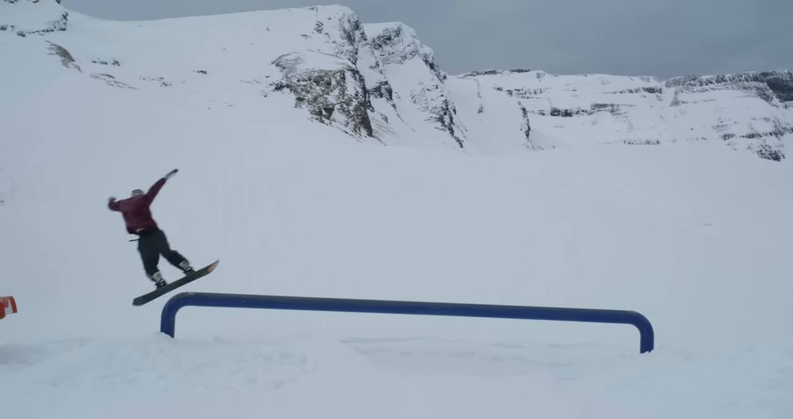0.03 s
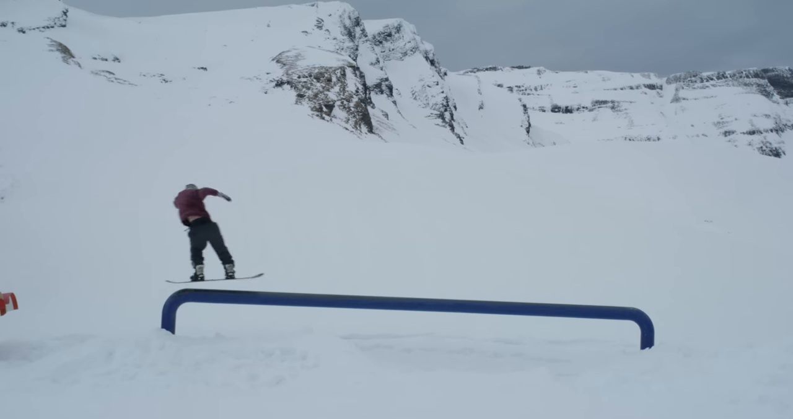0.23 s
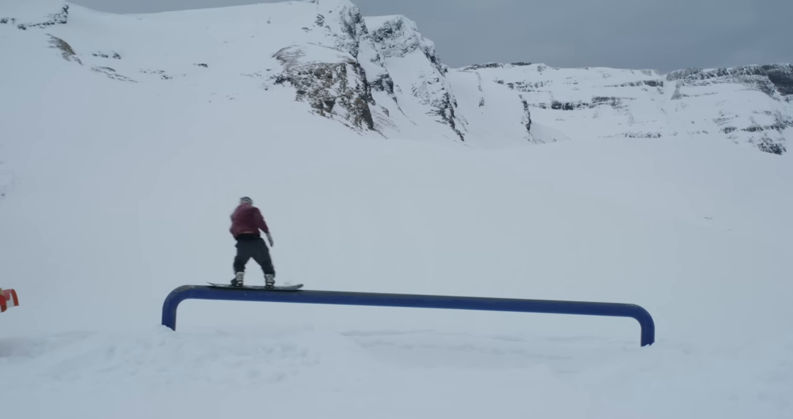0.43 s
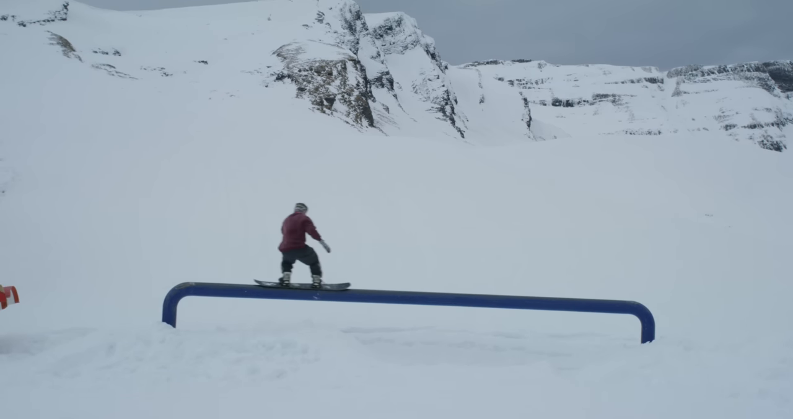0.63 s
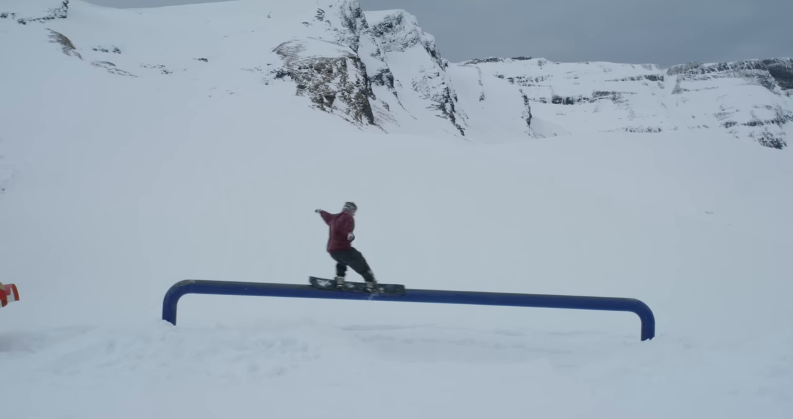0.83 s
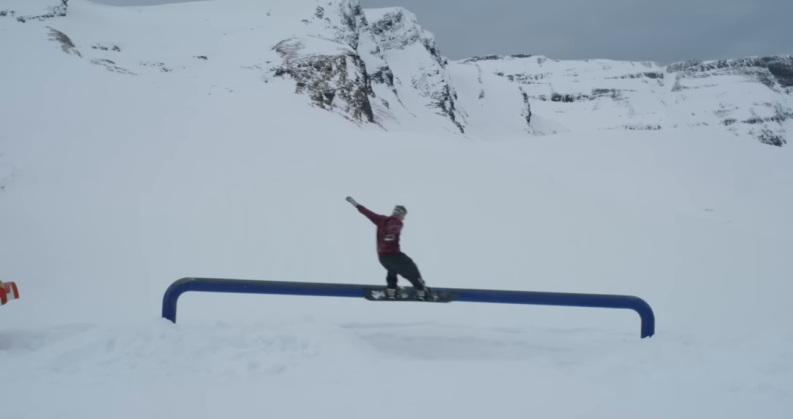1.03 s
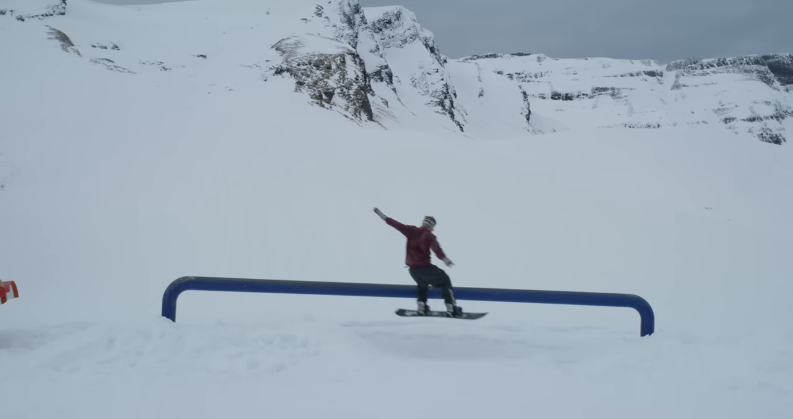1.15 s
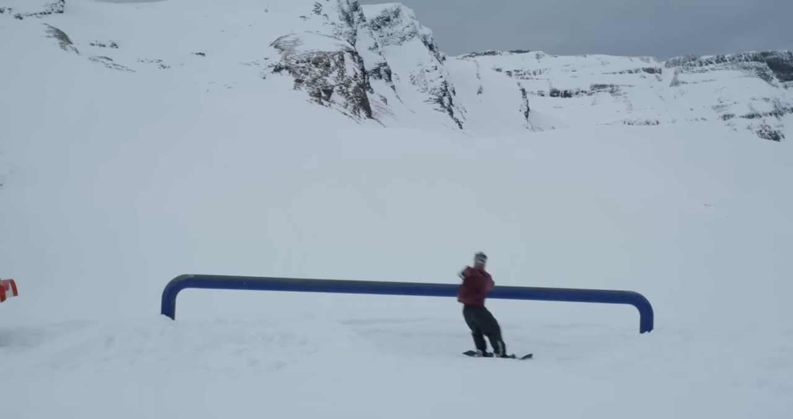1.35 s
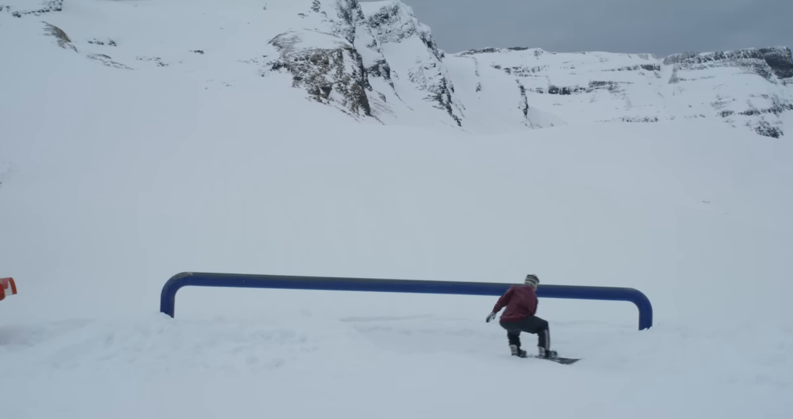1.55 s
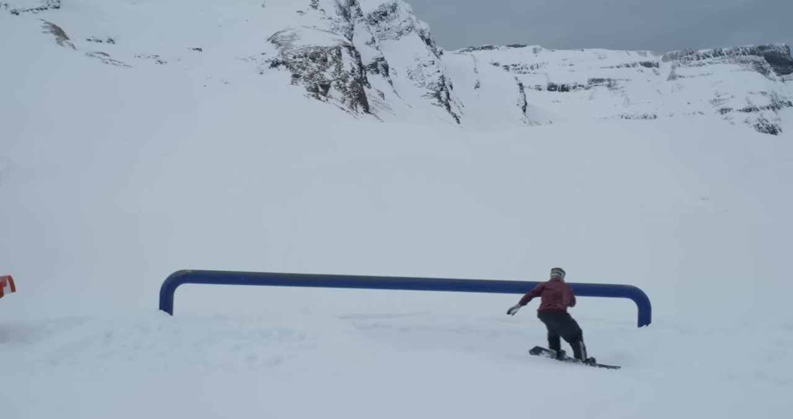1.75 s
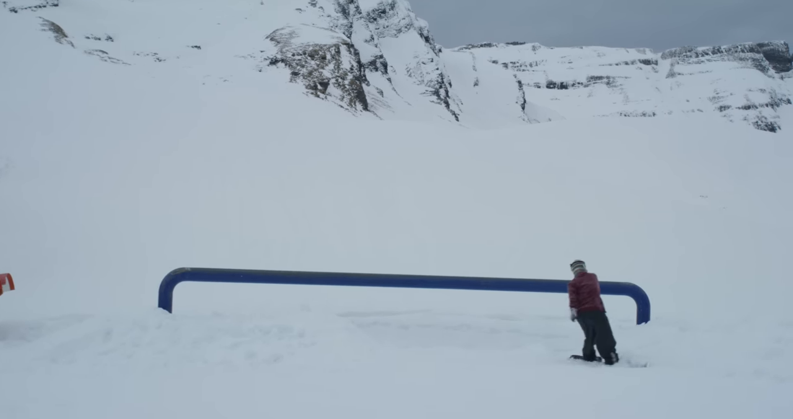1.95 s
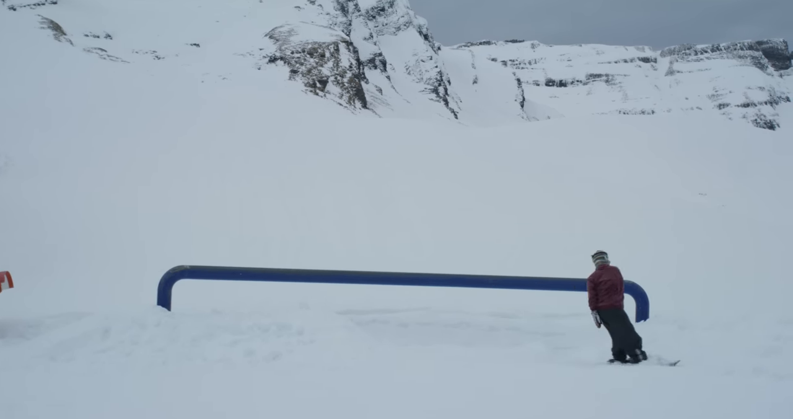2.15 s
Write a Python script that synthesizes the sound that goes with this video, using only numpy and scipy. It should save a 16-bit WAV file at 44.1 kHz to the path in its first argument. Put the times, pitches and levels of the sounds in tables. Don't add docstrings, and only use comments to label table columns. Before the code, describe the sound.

A snowboard lands on a steel pipe rail with a sharp double clank, the pipe ringing as the base grinds along, then a light snap off and a soft snow landing; outdoors, wind rumbling on the camera microphone.

```python
import sys
import numpy as np
from scipy import signal
from scipy.fft import rfft, irfft
from scipy.io import wavfile
from scipy.ndimage import uniform_filter1d

SR = 44100
rng = np.random.default_rng(int(sys.argv[2]) if len(sys.argv) > 2 else 0)


def put_to_file(sound):
    columns = np.atleast_2d(sound).T
    safe = np.clip(columns, -1, 1)
    whole_steps = np.round(safe * 32767)
    wavfile.write(sys.argv[1], SR, whole_steps.astype(np.int16))


def makeup_ratio(level_db):
    decades = np.asarray(level_db, float) / 20
    return 10 ** decades


N = 97020
T = np.arange(N) / SR


def colour(x, points):
    p, hz = np.array(points, float), np.fft.rfftfreq(4096, 1 / SR)
    log_gain = np.interp(np.log(hz + 1), np.log(p[:, 0]), p[:, 1]) * np.log(10) / 20
    cepstrum = irfft(log_gain)
    cepstrum[1:2048] *= 2
    cepstrum[2049:] = 0
    h = irfft(np.exp(rfft(cepstrum)))
    return signal.fftconvolve(x, h / np.sqrt(np.sum(h ** 2)))[:len(x)]


def band(x, hz, width_hz):
    b, a = signal.iirpeak(min(hz, 0.45 * SR), hz / width_hz, SR)
    return signal.filtfilt(b, a, x)


def walk(rate):
    k = int(SR / rate)
    steps = np.repeat(rng.standard_normal(N // k + 1), k)
    return np.sqrt(2) * uniform_filter1d(uniform_filter1d(steps, k), k)[:N]


def grit(spread_db, per_s):
    k = int(SR / per_s)
    grain_db = spread_db * np.minimum(rng.exponential(size=N // k + 1), 4)
    x = rng.standard_normal(N) * np.repeat(makeup_ratio(grain_db), k)[:N]
    return x / np.sqrt(np.mean(x ** 2))


def curve(rows, col, off=-150.):
    r = np.array(rows, float)
    return np.interp(T, r[:, 0], r[:, col], left=off, right=off)


def ring(modes):
    return sum(g * np.sin(2 * np.pi * f * T) * 10 ** (-3 * T / t60) for f, g, t60 in modes)


def hiss():
    # f/Hz, level/dB per Hz
    hiss_tone = [(300, 4), (2000, -7.5), (4200, -13), (5000, -16.5), (16000, -21)]
    whine = makeup_ratio(-70.5 + 1.8 * walk(11.7)) * band(rng.standard_normal(N), 11160, 1060)
    return makeup_ratio(-69) * colour(rng.standard_normal(N), hiss_tone) + whine


def wind():
    # t/s, level/dB
    gusts = [(0.0, -45), (0.21, -44.5), (0.23, -34), (0.37, -39.5), (0.39, -37.5), (0.54, -41.5),
             (0.59, -41), (0.78, -50.5), (0.81, -45.5), (0.85, -52), (1.46, -38.5), (1.48, -43.5),
             (1.6, -38), (1.83, -42), (2.11, -40), (2.2, -42.5)]
    # f/Hz, level/dB per Hz
    wind_tone = [(12, -20), (20, -14), (90, -4), (242, -15.5), (520, -33), (625, -34), (992, -48),
                 (1110, -47), (5000, -79), (6500, -103), (11000, -120)]
    air, out = colour(rng.standard_normal(N), wind_tone), 0
    gust_db = curve(gusts, 1, -45.) + walk(25.3)
    for hz in 25 * 2 ** np.arange(0, 8, .5):
        out = out + makeup_ratio(gust_db - 7 + 0.31 * walk(25.8)) * band(air, hz, hz / 2)
    return out


def buffets():
    # t/s, level/dB, f/Hz
    puffs = [(.242, -26.5, 64.5), (.3, -32, 80), (.322, -31.5, 130), (.397, -28.5, 100), (0.799, -39, 54.7),
             (1.355, -35.5, 65), (1.44, -37.5, 90)]
    out = np.zeros(N)
    for s, db, hz in puffs:
        swell = np.exp(-((T - s) * hz / 0.57) ** 2)
        out += makeup_ratio(db) * swell * np.cos(2 * np.pi * hz * (T - s))
    return out


def carve():
    # t/s, level/dB, brightness/dB per octave
    carving = [(1.376, -52, -1.5), (1.47, -54.5, -0.5), (1.5, -58, 0), (1.68, -58.5, 0),
               (1.74, -60.5, -2.5), (1.92, -56.5, 2.5), (1.99, -59, 2), (2.04, -62.5, 6.5),
               (2.2, -63.5, -1)]
    # f/Hz, level/dB per Hz
    snow_tone = [(300, 4), (700, -11), (1600, -18), (3300, -9.5), (4100, -13), (4400, -22.5), (6000, -19.5),
                 (16000, -34.5)]
    # t/s, level/dB, length/s
    packs = [
        (1.382, -47, 0.013),
        (1.407, -40.5, 0.017),
        (1.464, -41.5, 0.011),
        (1.686, -47, 0.0081),
        (1.761, -44.5, 0.0055),
        (1.914, -55, 0.014),
    ]
    takeoff_db, takeoff_t60_s, landing_rise_s = -49, 0.016, 0.0042
    snow = colour(grit(1.46, 1200), snow_tone)
    db, tilt = curve(carving, 1) + walk(45.23), curve(carving, 2, 0.)
    spray = 0
    for hz in 500 * 2 ** np.arange(0, 5.1, .5):
        band_db = tilt * np.log2(hz / 3000) + 0.19 * walk(30.4)
        spray = spray + makeup_ratio(band_db) * band(snow, hz, hz / 2)
    crush = sum(makeup_ratio(p_db) * np.exp(-((T - s) / wide) ** 2) for s, p_db, wide in packs)
    landed = makeup_ratio(db) * spray + crush * band(grit(2.4, 660), 1810, 2540)
    rise = np.clip((T - carving[0][0]) / landing_rise_s, 0, 1)
    takeoff = makeup_ratio(takeoff_db) * 10 ** (-3 * T / takeoff_t60_s) * snow
    return rise * landed + takeoff


def slide():
    # t/s, level/dB
    slide_level = [(.376, -52), (.42, -53), (.47, -43.5), (.62, -54.5), (.8, -52.5), (.92, -45.5),
                   (.96, -60.5), (1.02, -61.5), (1.1, -54)]
    # f/Hz, level/dB per Hz
    grind_tone = [(300, -16.5), (700, -16.5), (1300, -5.5), (2200, -15), (3900, -17), (4600, -27),
                  (7000, -27), (16000, -49)]
    # f/Hz, level/dB per Hz
    snap_tone = [(290, -27), (500, -11), (1180, -7.5), (3340, -11), (4470, -20), (7100, -18.5),
                 (11100, -34), (14700, -22), (16000, -37)]
    snap_s, snap_len_s, snap_db = 1.1018, 0.016, -43
    tail_db, tail_t60_s = -15.5, 0.81
    since = T - snap_s
    grind = makeup_ratio(curve(slide_level, 1) + 1.4 * walk(34.68)) * grit(2.16, 1500)
    gate = uniform_filter1d(1. * (since > 0) * (since < snap_len_s), 90)
    snap = makeup_ratio(snap_db + 2.0 * walk(300)) * gate * grit(2.0, 2500)
    fade = (since > 0) * 10 ** (-3 * np.abs(since) / tail_t60_s)
    tail = makeup_ratio(snap_db + tail_db) * fade * grit(0.83, 1500)
    sound = colour(grind + tail, grind_tone) + colour(snap, snap_tone)
    rub_force = makeup_ratio(-33) * grind
    snap_force = makeup_ratio(-15) * band(snap, 3940, 5900)
    return sound, rub_force, snap_force


def linger():
    # f/Hz, t60/s, signed swing from the blow/thousandths, from the lift-off/thousandths
    standing = [(1167.74, 5.0, 0.57, -0.31), (1170.72, 1.11, 10.42, -0.65), (1176.17, 5.0, -2.85, -1.43),
                (1178.72, 1.29, -19.24, -2.43), (1179.75, 4.87, -1.92, -0.08),
                (1181.93, 2.18, -11.23, -0.77), (1185.14, 5.0, 1.9, 0.97), (1187.57, 2.15, 5.18, -0.63),
                (1192.18, 1.33, 13.91, 0.48), (1197.27, 0.71, -38.0, -0.96), (1201.97, 4.59, 0.6, 0.22),
                (1209.25, 1.28, 6.87, -0.47), (1212.36, 1.24, 15.47, -0.58), (1219.78, 4.81, -0.4, 0.13)]
    main_blow_s, lift_off_s, spread_s = 0.4303, 1.105, 0.15
    build_up = np.minimum(T / spread_s, 1) ** 2
    out = np.zeros(N)
    for s, col in ((main_blow_s, 2), (lift_off_s, 3)):
        i = round(s * SR)
        modes = [(m[0], m[col] / 1000, m[1]) for m in standing]
        out[i:] += (ring(modes) * build_up)[:N - i]
    return makeup_ratio(1.35) * out


def pipe(blow, rub, snap):
    # lowest f/Hz, level/dB, t60/s, build-up/s, travel-time factor/1
    ring_tones = [(645, -5.5, 0.69, 0.1, 1), (1179, 4, 0.18, .05, 1.8), (1888.5, -3.5, 0.9, 0.084, .7),
                  (2806, -4, 0.68, 0.072, 0.44), (3840, -1.5, 0.32, 0.046, 0.25),
                  (5250, -13.5, 0.24, 0.011, .3), (8000, -7, 0.14, 0.044, 0.33)]
    # fastest travel/s, level/dB
    paths = [(0.01, 2.5), (.033, -3.5), (.056, -1), (0.089, -3.5)]
    # drive from the snap/dB, change as the board settles on the steel/dB
    grip = [(-6, -.1), (-25, -3), (-8, -1.5), (-1, -14), (-5, -8), (-3, -6), (2, -6)]
    settle_s, settle_len_s = 0.587, 0.013
    settled = np.clip((T - settle_s) / settle_len_s, 0, 1)
    out = 0
    for (hz, db, t60, rise, slow), (snap_db, choke_db) in zip(ring_tones, grip):
        h, fade = 0, 10 ** (-3 * T / t60)
        for lag, path_db in paths:
            late = np.sqrt(np.clip(T ** 2 - (lag * slow) ** 2, 0, None))
            swell = (1 - np.exp(-late / rise)) ** 2
            h = h + makeup_ratio(db + path_db) * swell * fade * np.sin(2 * np.pi * hz * late)
        struck = signal.fftconvolve(blow, h)[:N]
        rubbed = signal.fftconvolve(rub + makeup_ratio(snap_db) * snap, h)[:N]
        out = out + makeup_ratio(choke_db * settled) * struck + rubbed
    return makeup_ratio(-23) * out


def knocks():
    # t/s, level/dB, contact time/ms, share into the pipe/dB, board body/dB
    contacts = [(0.3757, -21, 0.27, -21, -1), (0.387, -29.5, 0.088, -7, -1), (0.4273, -30.5, 1, -17.5, 4.5),
                (0.4301, -14, 0.063, 1, -7), (0.4323, -22, 0.28, -6, 6.5), (0.4377, -8, 0.15, -2.5, -1.5),
                (0.4433, -10.5, 0.23, -8.5, -3.5), (0.445, -19.5, 0.18, -7, -7),
                (0.4747, -21, 0.2, -4, -3.5), (0.487, -22.5, 0.64, 4.5, -1), (0.489, -24, 0.55, -10, 4),
                (0.4992, -26, 0.34, -10, -10), (0.551, -20.5, 0.4, -7, -22), (0.599, -43, 0.042, -13, -26),
                (1.187, -52, .15, -10, -23), (1.3035, -50, 0.21, -6, -20), (1.678, -54, .05, -24, -18),
                (1.7585, -52.5, .05, 1, -30)]
    # f/Hz, level/dB, t60/s
    board = [(416, -7, 0.066), (569, -4, 0.061), (753, -21.5, 0.24), (883, -5, 0.088), (926, -14, 0.094),
             (1044, -16, 0.17), (1129, -14.5, 0.27), (1259, -10, 0.17), (1476, -4, 0.069),
             (2050, -11, 0.064), (1770, -16, 0.027), (2800, -7, 0.039), (3230, 3.5, 0.017),
             (3645, 0, 0.011)]
    # f/Hz, level/dB per Hz
    crack_tone = [(120, -16), (200, -22), (916, 2), (1400, -6.5), (1620, -10), (2860, -10), (4600, -23),
                  (7410, -23), (16000, -49)]
    crack_db, crack_t60_s, rattle_db, rattle_t60_s = -2, 0.017, -15.5, 0.14
    board_db, spike_db = -8, 11
    sound, force = np.zeros(N), np.zeros(N)
    n = int(0.3 * SR)
    t = T[:n]
    mode_hz, mode_db, mode_t60 = np.array(board).T[:, :, None]
    crack = makeup_ratio(crack_db) * 10 ** (-3 * t / crack_t60_s)
    rattle = makeup_ratio(rattle_db) * 10 ** (-3 * t / rattle_t60_s)
    spike = makeup_ratio(spike_db) * (t == 0)
    for s, db, ms, pipe_db, body_db in contacts:
        i = int(s * SR)
        detune, uneven = rng.standard_normal((2, len(board), 1))
        noise = rng.standard_normal(n) * (crack + rattle)
        push = np.exp(-t / (ms / 5140.0))
        push = push / push.sum()
        cycles = mode_hz * (1 + 0.004 * detune) * t
        modes = makeup_ratio(mode_db + 2.0 * uneven) * np.sin(2 * np.pi * cycles) * 10 ** (-3 * t / mode_t60)
        hit = makeup_ratio(board_db + body_db) * modes.sum(0) + colour(noise + spike, crack_tone)
        sound[i:i + n] += makeup_ratio(db) * signal.fftconvolve(hit, push)[:n][:N - i]
        force[i:i + n] += makeup_ratio(db + pipe_db) * push[:N - i]
    return sound, force


def scene():
    background = hiss() + wind() + buffets()
    grind, rub, snap = slide()
    hits, blow = knocks()
    rail = linger() + pipe(blow, rub, snap)
    return (background + carve() + grind + rail + hits)[None]


def low_pass(x):
    return signal.sosfilt(signal.butter(12, 16480, fs=SR, output="sos"), x)


def record(dry):
    peak_limit, low_cut_hz, top_hz = 0.42, 28, 15800
    soft = peak_limit * np.tanh(dry / peak_limit)
    low_cut = signal.butter(2, low_cut_hz, "high", fs=SR, output="sos")
    high_cut = signal.ellip(8, 0.2, 20, top_hz, fs=SR, output="sos")
    mix = signal.sosfilt(high_cut, signal.sosfilt(low_cut, soft))
    return low_pass(mix)


dry = scene()
out = record(dry)
put_to_file(out)
```